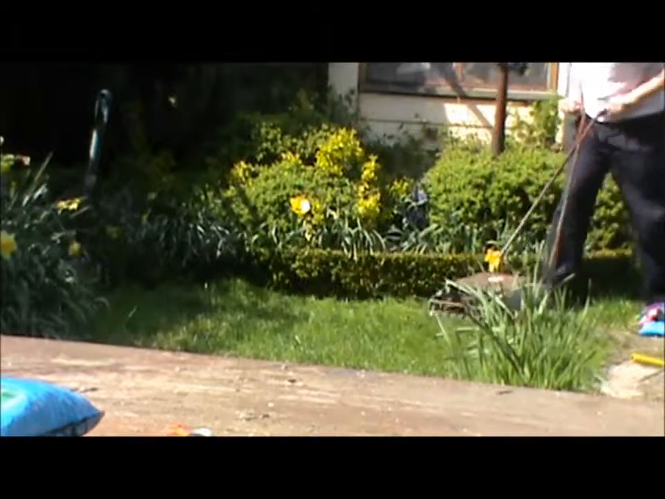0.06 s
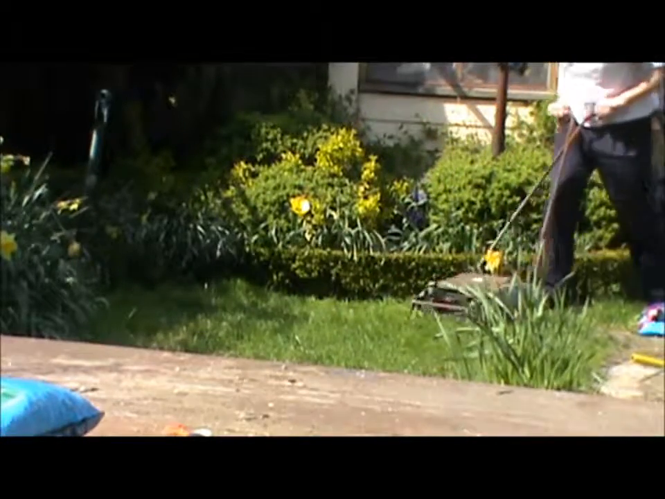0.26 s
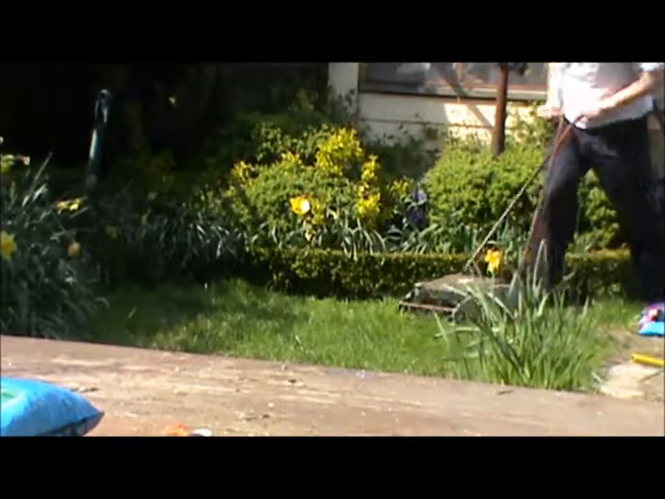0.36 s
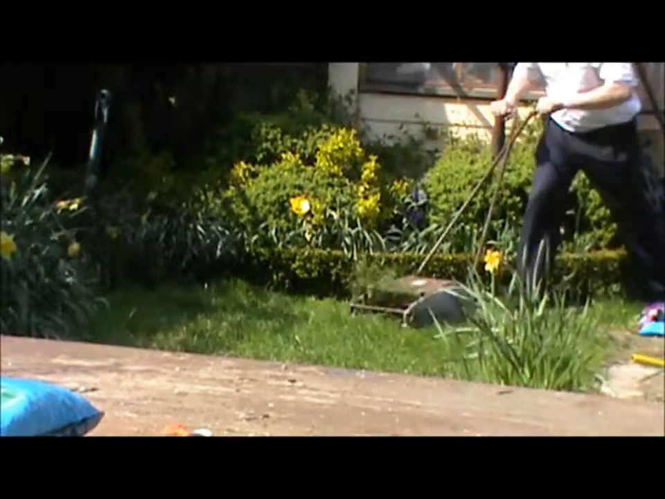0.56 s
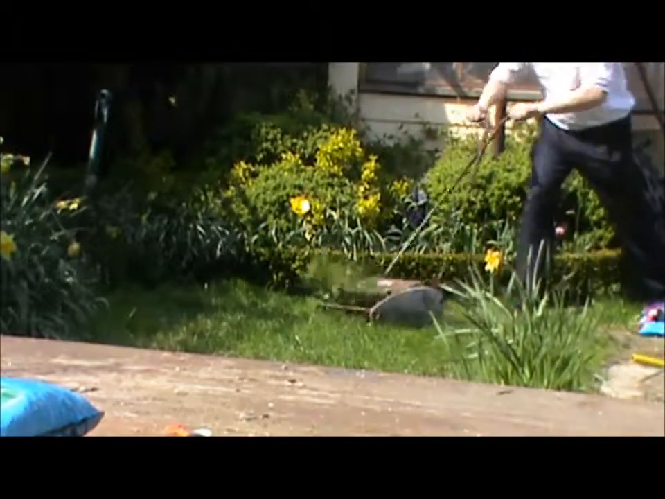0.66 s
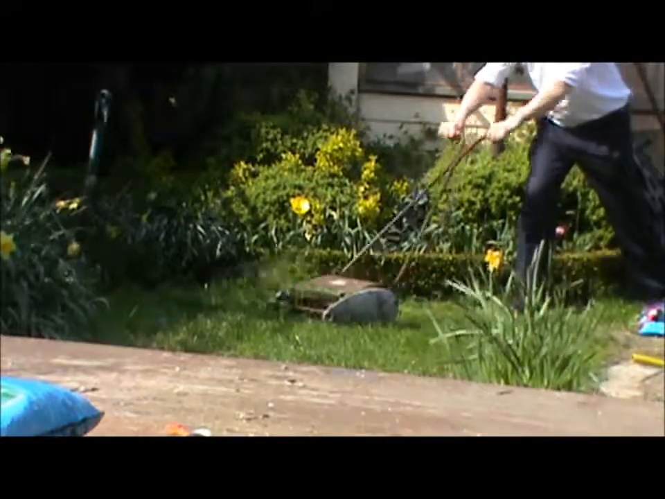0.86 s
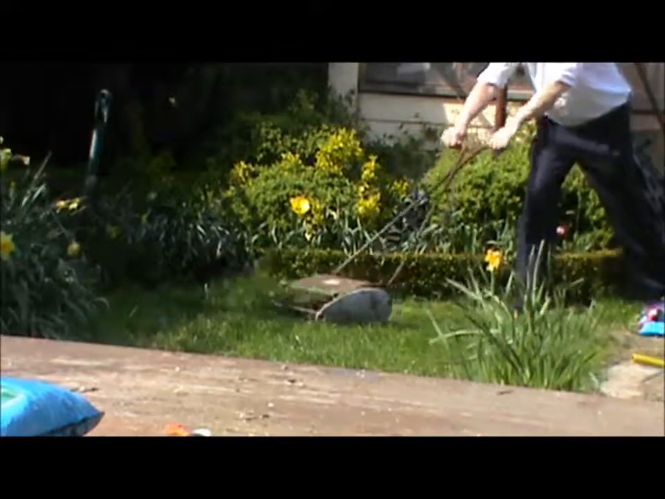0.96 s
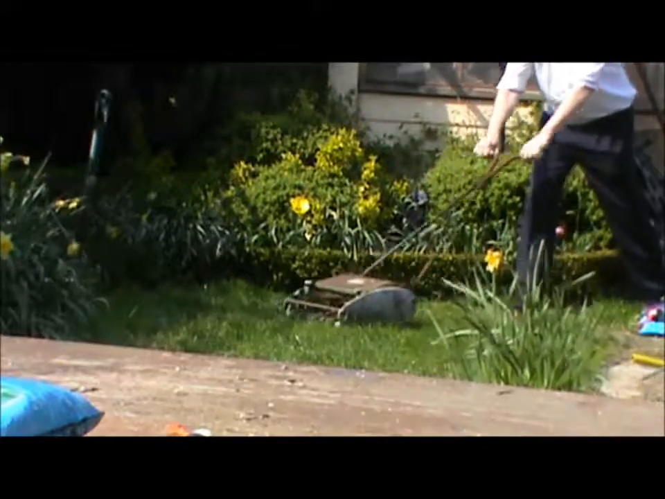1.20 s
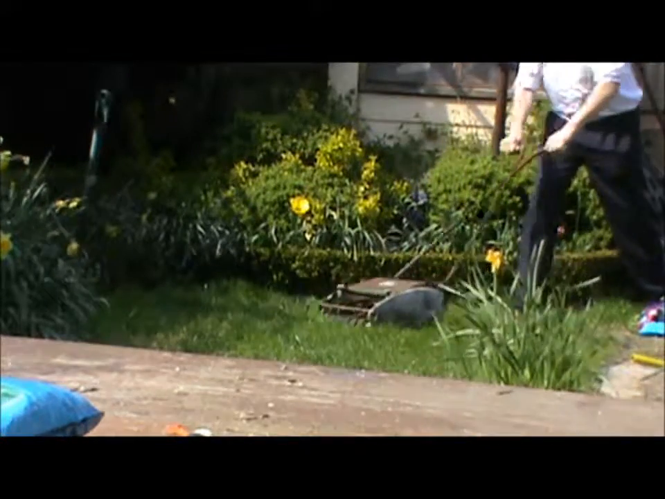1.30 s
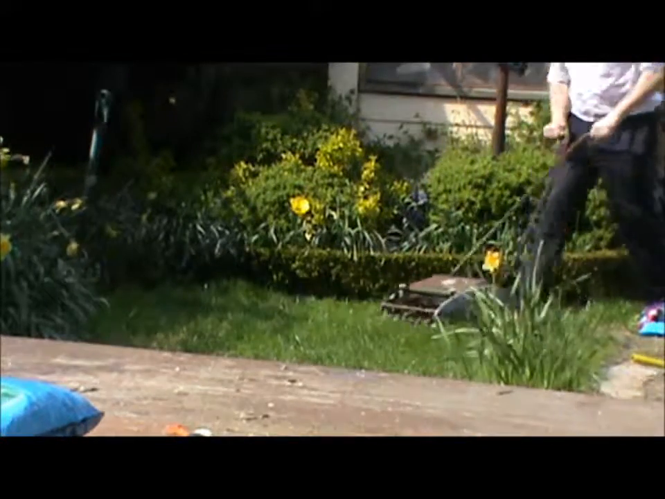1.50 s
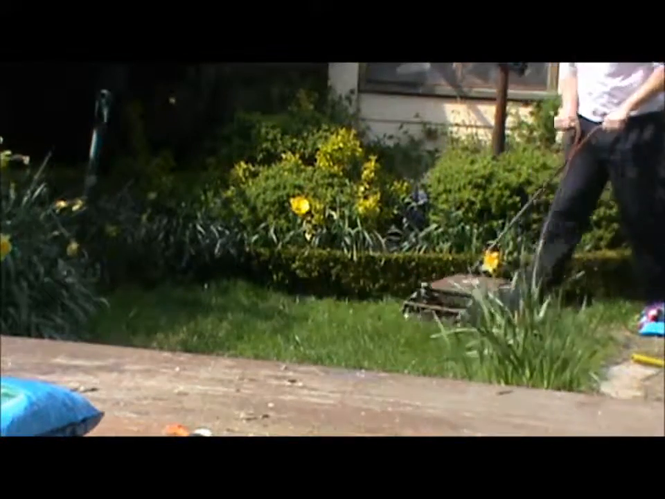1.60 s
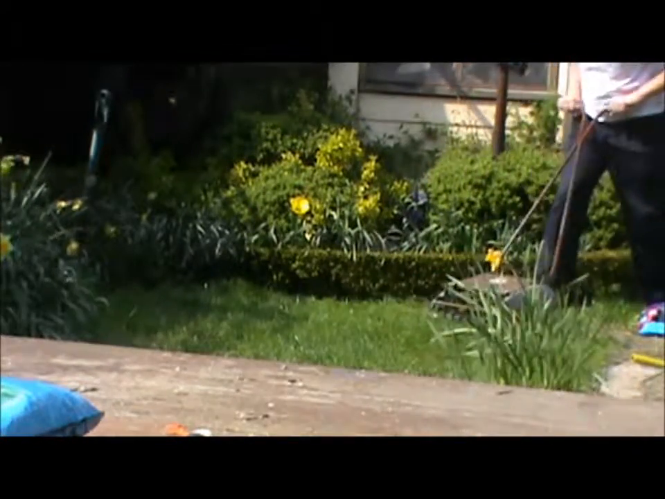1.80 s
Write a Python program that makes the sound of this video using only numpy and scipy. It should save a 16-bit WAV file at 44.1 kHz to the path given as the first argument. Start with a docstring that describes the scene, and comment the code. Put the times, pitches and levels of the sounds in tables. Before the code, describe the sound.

A hand-pushed reel mower whirrs forward through grass, then rolls back with clicks and knocks.

```python
"""A hand-pushed reel mower makes one stroke across a garden lawn, a few metres away.
First the handle knocks and the ratchet pawls click as the wheels take up. The reel gathers speed:
stick-slip friction of its blades on the fixed knife rattles the ringing iron frame, the reel holds
a hollow note, and grass stalks snap. Then the reel slows and the mower is pulled back, more quietly,
with further knocks and clicks. Throughout, there is a short diffuse echo and a low outdoor rumble."""
import sys
import numpy as np
from scipy import signal
from scipy.fft import rfft, irfft
from scipy.io import wavfile
from scipy.ndimage import uniform_filter1d

SR = 44100
rng = np.random.default_rng(int(sys.argv[2]) if len(sys.argv) > 2 else 0)


def output_pcm(signal):
    """Save a mono or channel-first signal as 16-bit PCM at the path in sys.argv[1].

    Samples are clipped to [-1, 1] before scaling.
    """
    pcm = np.clip(np.atleast_2d(signal).T, -1, 1) * 32767
    wavfile.write(sys.argv[1], SR, np.round(pcm).astype(np.int16))


N = 81585

# Speed of the reel. Each row: time in seconds, blade passes per second.
REEL_SPEED = [(0, 8.6), (.25, 17), (.48, 27.4), (.62, 27.5), (.73, 35.6), (.9, 34.6), (1.1, 28), (1.4, 18),
              (1.85, 13.4)]
# Effort of the push and the pull back.
# Each row: time in seconds, then relative levels in dB of frame rattle, blade scrape and grass.
EFFORT = [(0, -31, -42.5, -39), (.085, -39, -35.5, -39.5), (.14, -27.5, -74, -53), (.2, -37, -31, -60),
          (.275, -19.5, -34.5, -36), (.345, -25.5, -38, -29.5), (.45, -14.5, -24.5, -25.5),
          (.55, -14.5, -22, -24.5), (.63, -13.5, -22.5, -33.5), (.69, -14, -20.5, -28),
          (.77, -13, -20.5, -26.5), (.92, -17.5, -28.5, -31.5), (1, -25.5, -36, -32), (1.08, -35, -40, -51),
          (1.17, -32.5, -34.5, -46.5), (1.25, -45.5, -49, -44.5), (1.285, -38, -37.5, -44),
          (1.35, -51, -48, -45), (1.44, -27.5, -30.5, -43), (1.53, -33, -30.5, -44),
          (1.59, -31.5, -34.5, -36.5), (1.67, -31, -41, -42.5), (1.76, -42, -43, -42.5),
          (1.85, -44, -51, -46)]
# Envelopes of two resonances. Each row: time in seconds, relative level in dB.
REEL_NOTE_SWELL = [(.18, -58), (.32, -34), (.4, -18), (.55, -23), (.68, -24), (.77, -21), (.88, -20.5),
                   (1, -28), (1.06, -39), (1.16, -46), (1.22, -70)]
BLADE_RING_SWELL = [(.68, -6), (.75, 3.5), (.88, 2), (1.2, -5)]  # greatest at top speed
# Pawl impacts, plus the sharp treble tick that opens the handle knock at 1.09 s. Each row: start in seconds,
# crack level in dB, ring level in dB, decay in seconds.
PAWL_CLICKS = [(0.1979, -27, -16, 0.0038), (0.246, -28.5, -22, 0.0037), (0.2708, -26, -26.5, 0.016),
               (0.297, -26.5, -31, 0.0066), (0.802, -21.5, -20.5, 0.0084), (1.091, -26.5, -57, 0.0083),
               (1.1363, -28.5, -24.5, 0.018), (1.1552, -21, -38, 0.019), (1.464, -21, -25, 0.011),
               (1.566, -17.5, -26, 0.0086), (1.605, -28.5, -31.5, 0.0043), (1.739, -31.5, -29, 0.016)]
# A pawl skidding over a tooth. Each row: start in seconds, level in dB, decay in seconds.
PAWL_SKIDS = [(0.275, -25.5, .018)]
# Knocks of handle and frame. Each row: start in seconds, chatter level in dB, ring level in dB,
# decay in seconds, frequency struck hardest in Hz.
HANDLE_KNOCKS = [(.108, -26.5, -23, 0.012, 620), (0.596, -24.5, -8.5, 0.02, 855),
                 (1.09, -23, -19.5, 0.016, 1130), (1.109, -16, -19, 0.0067, 775),
                 (1.16, -32.5, -30.5, 0.032, 1090), (1.417, -24.5, -26, 0.012, 775)]
# Normal modes. Each row: frequency in Hz, relative level in dB, time to fall 60 dB in seconds.
FRAME_MODES = [(190.7, 2.5, 0.21), (229, -0.5, 0.23), (276.4, -7, 0.73), (347.2, -3, 0.47), (508, -3, 0.17),
               (589.5, -3, 0.11), (806.3, 4, 0.1), (861, 0.5, 0.21), (880, -4, 0.4)]
BLADE_MODES = [(1300, 0, .16), (1342, 2, .16), (1405, 1.5, .16), (1636, -7, .1), (2207, -14, .06)]  # blades and knife
PAWL_MODES = [(9300, 1, 0.011), (9850, 3.5, 0.018), (10600, 1.5, 0.012)]
TOOTH_MODES = [(4520, -1, .012), (5480, 0, .007)]
HANDLE_MODES = [(345.6, 2, .8), (634, 1.5, 0.14), (775, 2.5, 0.06), (855, -1, 0.28), (1077, -11, 0.061),
                (1387, -2, 0.16)]
# Spectra of the noises. Each row: frequency in Hz, relative spectral density in dB.
RATTLE_SPECTRUM = [(100, -34.5), (155, -18.5), (185, 2.5), (360, 0.5), (440, -5), (560, 1.5), (740, 1.5),
                   (850, -7), (1100, -11.5), (1600, -14), (3000, -46)]
SCRAPE_SPECTRUM = [(400, -61), (900, -10.5), (1350, -1.5), (1700, -5.5), (2100, -4.5), (2800, -15.5),
                   (5000, -18), (12000, -47)]
GRASS_SPECTRUM = [(800, -28.5), (2500, 4), (3700, 0), (5800, 0.5), (7300, -7), (9000, 4), (10800, 1),
                  (12200, -7.5), (13600, -1), (16000, -26)]
CRACK_SPECTRUM = [(100, -58), (350, -17), (1300, -5), (2200, -9.5), (3300, 0), (4000, -3), (5600, 2),
                  (7500, -8.5), (8800, -1.5), (11400, -5.5), (12500, -5.5), (16000, -16.5)]
AIR_SPECTRUM = [(20, -24), (50, -0.5), (85, -4), (125, -9), (300, -12.5), (800, -11.5), (2000, -38),
                (7000, -37.5), (10000, -31), (16000, -34)]
# Stereo balance. Each row: frequency in Hz, left level minus right level in dB.
BALANCE = [(60, -22), (200, -0.5), (380, -4), (700, -2), (1300, -1), (3000, -.5), (15000, 0)]
# Stereo width by frequency; the highest treble narrows almost to mono.
# Each row: frequency in Hz, side level relative to the direct sound in dB.
STEREO_WIDTH = [(60, 11), (300, -15.5), (1000, -10.5), (4500, -9.5), (10000, -12), (14000, -30)]

RATTLE_DB, FRAME_RING_DB, SCRAPE_DB, GRASS_DB = -3, -4, -6, -2
PASS_DECAY, CONTACT_FLOOR = 0.23, 1.63  # share of a pass; steady pressure beneath the pulses
BLADE_SCATTER_DB = -1.5
SLIPS_PER_S, SLIP_SCATTER_DB, FRICTION_LOW_HZ = 5000, 1.5, 178
SNIPS_PER_S, SNIP_SCATTER_DB = 16000, 1
CLUMPS_PER_S, CLUMP_DB = 21.4, 2.1  # uneven thickness of the grass
NOTE_HZ, NOTE_WANDER_HZ, NOTE_FLUTTER_DB, NOTE_PULSE_DEPTH = 533, 20, 3, 0.6
CLICK_ATTACK_S, CLICK_TAIL_DB, CLICK_TAIL_S = 0.002, -11, 0.017
KNOCK_ATTACK_S, BLOW_WIDTH_S, STRUCK_MODE_DB = 0.001, 0.0001, 14.5
ECHO_DELAY_S, ECHO_T60_S, ECHO_CENTRE_DB, CENTRE_HIGHPASS_HZ = 0.0087, 0.11, -10.5, 2250
AIR_DB, AIR_SIDE_DB = -40, -25
TOP_HZ = 15750


def mower():
    """Forced vibration: friction drives frame, blades and reel, while the grass is cut."""
    contact = blade_contact()
    shake = stick_slip(undb(curve(EFFORT, column=1)) * contact)
    scrape = stick_slip(undb(curve(EFFORT, column=2)) * contact)
    grass = grass_snips(contact)
    rattle = undb(RATTLE_DB) * through(shake, response(RATTLE_SPECTRUM))
    frame_ring = undb(FRAME_RING_DB) * through(shake, ringing(FRAME_MODES))
    rasp = undb(SCRAPE_DB) * through(scrape, response(SCRAPE_SPECTRUM))
    blade_ring = through(undb(curve(BLADE_RING_SWELL)) * scrape, ringing(BLADE_MODES))
    return rattle + frame_ring + rasp + blade_ring + reel_note(contact) + grass


def blade_contact():
    """Periodic loading: pressure on the knife jumps as each blade arrives and eases as it slides."""
    passes = np.cumsum(curve(REEL_SPEED)) / SR
    strength = undb(BLADE_SCATTER_DB * rng.standard_normal(size=256))[passes.astype(int)]
    return unit(CONTACT_FLOOR + strength * np.exp(-(passes % 1) / PASS_DECAY))


def stick_slip(load):
    """Stick-slip friction: blades and gears catch and release in impulses that scale with the load."""
    return highpass(load * grains(SLIPS_PER_S, SLIP_SCATTER_DB), FRICTION_LOW_HZ, order=6)


def grass_snips(contact):
    """Fracture noise: snapping stalks merge into a hiss that swells with each pass and each clump."""
    clumps = undb(CLUMP_DB * wander(CLUMPS_PER_S))
    snaps = undb(curve(EFFORT, column=3)) * contact * clumps * grains(SNIPS_PER_S, SNIP_SCATTER_DB)
    return undb(GRASS_DB) * through(snaps, response(GRASS_SPECTRUM))


def reel_note(contact):
    """Friction-driven resonance: the rubbed reel holds one note, rough under load, clearer coasting."""
    load = undb(curve(EFFORT, column=1))
    hz = NOTE_HZ + NOTE_WANDER_HZ * np.sqrt(load / load.max()) * wander(per_s=67.7)
    phase = 2 * np.pi * np.cumsum(hz) / SR
    swell = undb(curve(REEL_NOTE_SWELL) + NOTE_FLUTTER_DB * wander(per_s=107))
    pulse = 1 + NOTE_PULSE_DEPTH * (contact - 1)
    return np.sqrt(2) * swell * pulse * np.sin(phase)


def ratchet():
    """Impact excitation: each pawl drops with a crack, a high ring and a faint rattle; one skids."""
    crack, ring = 0, 0
    for start, crack_db, ring_db, decay in PAWL_CLICKS:
        tail = undb(CLICK_TAIL_DB) * burst(start, CLICK_ATTACK_S, CLICK_TAIL_S)
        crack += undb(crack_db) * (burst(start, CLICK_ATTACK_S, decay) + tail)
        ring += undb(ring_db) * (burst(start, CLICK_ATTACK_S, decay) + tail)
    clicks = through(crack, response(CRACK_SPECTRUM)) + through(ring, ringing(PAWL_MODES))
    skid = sum(undb(db) * burst(start, CLICK_ATTACK_S, decay) for start, db, decay in PAWL_SKIDS)
    return clicks + through(skid, ringing(TOOTH_MODES))


def handle_knocks():
    """Backlash: the loose joint chatters as the load changes; each blow favours one mode of the tubes."""
    knocks = 0
    for start, chatter_db, ring_db, decay, struck_hz in HANDLE_KNOCKS:
        band = signal.butter(2, [struck_hz / 2, struck_hz * 2], "bandpass", fs=SR, output="sos")
        band_gain = np.sqrt(SR / (4 * struck_hz))  # offsets the power lost outside the band
        chatter = band_gain * signal.sosfilt(band, burst(start, KNOCK_ATTACK_S, decay))
        nearest_hz = min(HANDLE_MODES, key=lambda mode: abs(mode[0] - struck_hz))[0]
        modes = [(hz, db + STRUCK_MODE_DB * (hz == nearest_hz), t60) for hz, db, t60 in HANDLE_MODES]
        ring = through(blow(start, decay), ringing(modes))
        knocks += undb(chatter_db) * chatter + undb(ring_db) * ring
    return knocks


def blow(start, decay):
    """Impulsive force: one short push that excites the modes about as strongly as its chatter would."""
    push = np.exp(-((np.arange(N) / SR - start) / (BLOW_WIDTH_S / 2)) ** 2)
    return push / push.sum() * np.sqrt(decay * SR / 2)


def burst(start, attack, decay):
    """Contact chatter: noise that rises linearly and decays exponentially."""
    age = np.maximum(np.arange(N) / SR - start, 0)
    rise = np.minimum(age / attack, 1)
    fall = np.exp(-np.maximum(age - attack, 0) / decay)
    return rng.standard_normal(N) * rise * fall


def yard(direct):
    """Reverberation: a short diffuse echo, treble only in the centre and broadband at the sides."""
    t = np.arange(SR // 2) / SR
    envelope = np.exp(-np.log(1000) * t / ECHO_T60_S) * (t > ECHO_DELAY_S)
    tails = rng.standard_normal((2, len(t))) * envelope
    centre, side = (through(direct, tail / np.linalg.norm(tail)) for tail in tails)
    mid = rfft(direct + undb(ECHO_CENTRE_DB) * highpass(centre, CENTRE_HIGHPASS_HZ, order=1), 2 * N)
    side = rfft(side, 2 * N) * gains(STEREO_WIDTH, 2 * N)
    lean = np.sqrt(gains(BALANCE, 2 * N))  # places the mower a little to the right
    return irfft(np.array([(mid + side) * lean, (mid - side) / lean]))[:, :N]


def air():
    """Ambient noise: low outdoor rumble and faint hiss, nearly alike in both channels."""
    mid, side = (through(rng.standard_normal(N), response(AIR_SPECTRUM, size=8192)) for _ in range(2))
    return undb(AIR_DB) * (mid + undb(AIR_SIDE_DB) * side * np.array([[1], [-1]]))


def grains(per_s, scatter_db):
    """Shot noise: dense random impulses of uneven size, rms 1."""
    hits = rng.random(N) < per_s / SR
    signs = rng.choice([-1, 1], N)
    sizes = undb(scatter_db * np.minimum(rng.exponential(size=N), 2 * np.e))
    return unit(hits * signs * sizes)


def wander(per_s):
    """Low-pass noise: two moving averages leave a smooth drift, rms 1."""
    size = int(SR / per_s)
    noise = rng.standard_normal(N + 4 * size)
    drift = uniform_filter1d(uniform_filter1d(noise, size), size)
    return unit(drift[2 * size:2 * size + N])


def ringing(modes):
    """Modal superposition: damped cosines sum to an impulse response of unit energy."""
    t = np.arange(SR // 2) / SR
    impulse = 0
    for hz, db, t60 in modes:
        envelope = undb(db) / np.sqrt(t60) * np.exp(-np.log(1000) * t / t60)
        impulse += envelope * np.cos(2 * np.pi * hz * t)
    return impulse / np.linalg.norm(impulse)


def response(spectrum, size=2048):
    """Minimum phase: folding the cepstrum gives a causal impulse response, scaled to unit energy."""
    cepstrum = irfft(np.log(gains(spectrum, size)))
    cepstrum[1:size // 2] *= 2
    cepstrum[size // 2 + 1:] = 0
    impulse = irfft(np.exp(rfft(cepstrum)))
    return impulse / np.linalg.norm(impulse)


def gains(spectrum, size):
    """Gain at each frequency bin, interpolated in dB over log frequency."""
    hz, db = np.array(spectrum).T
    return undb(np.interp(np.log(np.fft.rfftfreq(size, 1 / SR) + 1), np.log(hz), db))


def curve(rows, column=1):
    """Linear interpolation of one table column in time."""
    rows = np.array(rows)
    return np.interp(np.arange(N) / SR, rows[:, 0], rows[:, column])


def through(x, impulse):
    """Convolution with an impulse response."""
    return signal.fftconvolve(x, impulse)[:N]


def highpass(x, hz, order):
    """Attenuation below a cutoff frequency."""
    return signal.sosfilt(signal.butter(order, hz, "high", fs=SR, output="sos"), x)


def undb(db):
    """Decibels to amplitude ratio."""
    return 10 ** (np.asarray(db) / 20)


def unit(x):
    """Normalisation to rms 1."""
    return x / np.sqrt(np.mean(x ** 2) + 1e-18)


def scene():
    """Superposition: the mower's sounds and their echo add to the still garden air."""
    return yard(mower() + ratchet() + handle_knocks()) + air()


def record(dry):
    """Clipping and band limiting: peaks stop at full scale, then the highest treble is cut."""
    lowpass = signal.ellip(10, 0.2, 80, TOP_HZ, fs=SR, output="sos")
    return signal.sosfilt(lowpass, np.clip(dry, -1, 1))


dry = scene()
out = record(dry)
output_pcm(out)
```